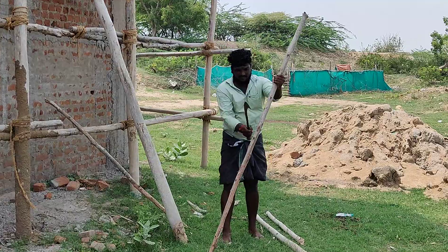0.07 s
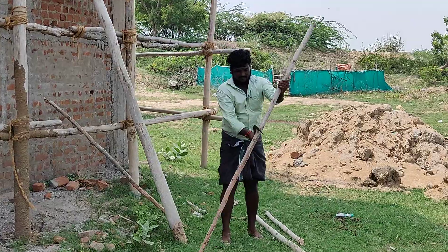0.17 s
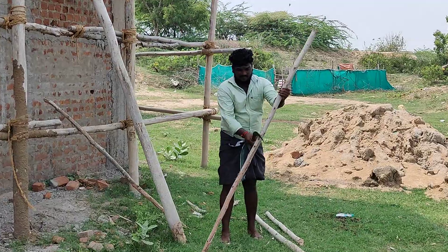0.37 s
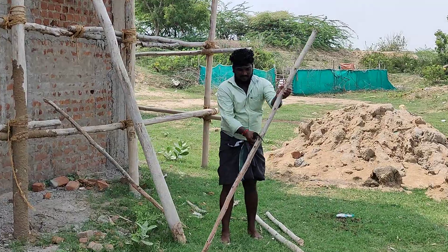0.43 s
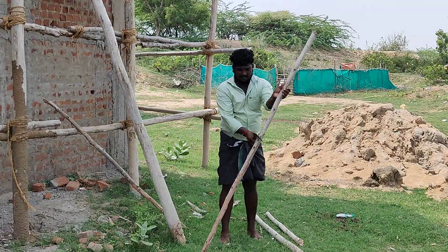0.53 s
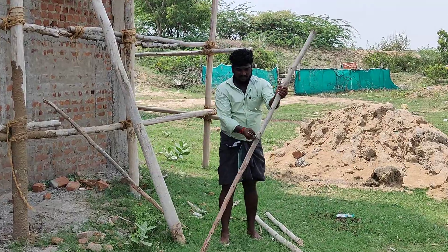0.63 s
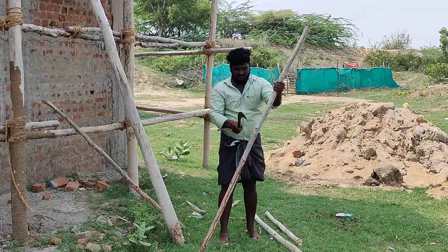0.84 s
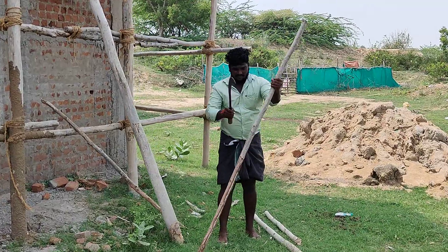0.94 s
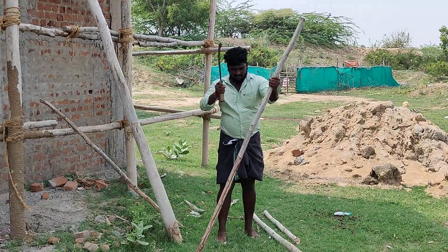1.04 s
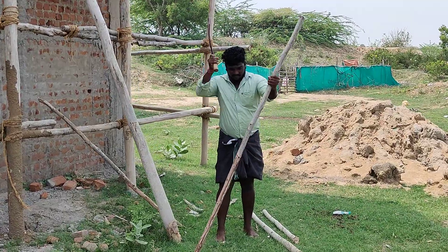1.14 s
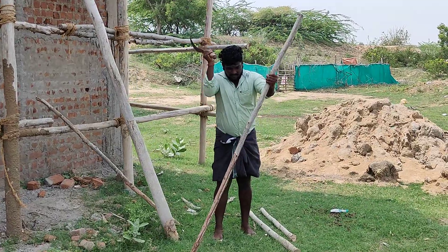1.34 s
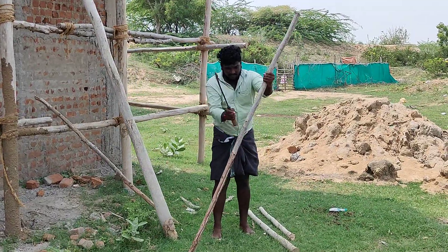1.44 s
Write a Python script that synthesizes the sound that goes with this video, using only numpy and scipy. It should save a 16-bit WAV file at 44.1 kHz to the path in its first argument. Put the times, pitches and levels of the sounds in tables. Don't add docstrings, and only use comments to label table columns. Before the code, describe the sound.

A long blade chops once into a bamboo pole with a sharp splintering crack, outdoors

```python
import sys
import numpy as np
from scipy import signal
from scipy.io import wavfile
from scipy.ndimage import uniform_filter1d

SR = 44100
rng = np.random.default_rng(int(sys.argv[2]) if len(sys.argv) > 2 else 0)


def int16_out(signal):
    q = np.round(np.clip(np.atleast_2d(signal).T, -1, 1) * 32767)
    wavfile.write(sys.argv[1], SR, q.astype(np.int16))


def volts_from_decibels(level):
    exponent = np.asarray(level, float) / 20
    return 10 ** exponent


N = 66150

# time in seconds, level in dB.
TEAR_EFFORT = [(.2, -42), (.2036, -29), (.2043, -22.5), (.232, -15), (.243, -21), (.262, -29.5),
               (.278, -41), (.3, -50.5)]
# frequency in Hz, level in dB per Hz.
SPLINTER_COLOUR = [(350, -24), (700, 3), (1200, -15.5), (2000, 7), (4000, 8), (6500, 7), (8000, -2),
                   (16000, -35.5)]
# start in seconds, level in dB.
FIBRE_FLASHES = [
    (.204, -33.5),
    (.2075, -36),
    (0.215, -23.5),
    (0.221, -14.5),
    (0.2282, -30.5),
    (0.2465, -30),
]
# time in seconds, level in dB.
BLADE_PUSHES = [
    (0.204, -11),
    (.208, -2.5),
    (0.2137, -6),
    (.2165, -5),
    (0.2207, -16),
    (0.231, -30),
]
# frequency in Hz, level in dB, t60 in seconds.
POLE_MODES = [(110, -24.5, 0.071), (221, -35, .11), (293, -29.5, 0.07), (519, -30.5, 0.061),
              (736.5, -25, 0.11), (1077, -18.5, 0.07), (1221, -12.5, 0.065), (824, -22.5, 0.049),
              (1930, -25, 0.16), (1313, -20, 0.13)]
# time in seconds, peak in dB, pitch in Hz, left minus right in dB.
FIBRE_SNAPS = [(.2042, -5, 3230, 13.5), (.2062, -7.5, 2630, 7.5), (.2079, 4, 4600, 8),
               (.2080, -14, 2190, -11.5), (.2140, -11.5, 2600, 23), (.2148, -6, 6000, 5.5),
               (.2158, 3, 1270, -12.5), (.2165, -9.5, 1900, 0), (.2210, -5, 4400, -4),
               (.2222, -3.5, 5770, -4.5), (.2303, -4.5, 6300, -2), (.2325, -1, 2900, -13),
               (.2387, -3, 3600, -4.5), (.2443, -9, 3020, -8), (.2410, -12.5, 3600, -4.5)]
# time in seconds, peak in dB, pitch in Hz, left minus right in dB.
WALL_SLIVERS = [(0.2058, -7.0, 3340.0, 13.0), (0.206, -16.0, 2580.0, -19.0), (0.2062, -16.0, 3940.0, 9.0),
                (0.2064, -14.0, 1940.0, -3.0), (0.2068, -18.0, 4820.0, 0.0), (0.2082, -17.0, 1140.0, 3.0),
                (0.212, -16.0, 3980.0, 13.0), (0.2122, -16.0, 2020.0, -3.0), (0.2135, -16.0, 6630.0, -4.0),
                (0.2144, -13.0, 1420.0, -3.0), (0.2149, -15.0, 5340.0, -15.0),
                (0.2153, -15.0, 3120.0, -3.0), (0.2162, -17.0, 3700.0, -5.0), (0.2198, -16.0, 5320.0, -4.0),
                (0.2198, -15.0, 4370.0, 2.0), (0.22, -17.0, 5770.0, -5.0), (0.2204, -17.0, 6350.0, -3.0),
                (0.2205, -17.0, 3120.0, -18.0), (0.2218, -18.0, 7110.0, -13.0),
                (0.2251, -14.0, 3190.0, -19.0), (0.226, -18.0, 1310.0, -37.0),
                (0.2273, -18.0, 6630.0, -19.0), (0.2294, -16.0, 5360.0, 2.0), (0.23, -16.0, 2450.0, -4.0),
                (0.23, -14.0, 6160.0, -7.0), (0.2303, -17.0, 7260.0, 2.0), (0.2311, -18.0, 4720.0, -12.0),
                (0.2311, -12.0, 3060.0, -7.0), (0.2318, -18.0, 3940.0, 0.0), (0.2383, -15.0, 3700.0, -4.0),
                (0.2395, -17, 3500, -4)]
# time in seconds, peak in dB, pitch in Hz, left minus right in dB.
CHIP_TICKS = [(.0642, -35.5, 3820, -22), (.1733, -47.5, 4100, -28), (.2, -36, 3902, 8),
              (.3232, -25.5, 6300, -17), (.3255, -31.5, 6360, -15), (.3788, -25, 4030, -8),
              (.3808, -29, 3880, -12), (.3853, -29.5, 3860, -8), (.3883, -31, 3600, 15),
              (.3942, -36.5, 3800, -31), (.3962, -25.5, 4270, 0), (.5523, -35, 2064, -6),
              (.5558, -31.5, 2150, -19), (.7518, -32.5, 3600, 12), (.7522, -34.5, 6370, 16),
              (.7617, -26, 6260, 6.5), (.7638, -30.5, 6350, -11)]
# start in seconds, attack in seconds, body in dB,
# t60 in seconds, fizz in dB.
SCRAPE_STROKES = [(-.02, 0.011, -84.5, 0.25, -49.5), (0.052, 0.013, -35, 0.11, -44.5),
                  (0.098, 0.0028, -43.5, 0.12, -49), (0.165, 0.0012, -62, 0.076, -50),
                  (.25, 0.014, -53, 0.61, -43.5), (.3, 0.016, -42, 0.48, -56),
                  (0.365, 0.018, -43, 0.21, -63), (0.544, 0.0025, -33.5, 0.41, -45.5),
                  (0.581, 0.021, -40.5, 0.093, -59.5), (0.711, 0.029, -52, 0.12, -57.5),
                  (0.749, 0.0012, -40.5, 0.077, -40.5), (0.759, 0.00055, -41.5, 0.071, -41.5)]
# frequency in Hz, width in Hz, level in dB.
SCRAPE_MODES = [(2083, 440, -3.5), (2840, 510, 0), (4100, 370, 3), (6530, 510, 0.5), (1700, 350, -6)]
# time in seconds, frequency in Hz, level in dB, t60 in seconds.
METAL_CHINKS = [(.064, 2154, -40.5, 0.044), (.1, 5300, -39, 0.085), (.105, 7120, -47, 0.024),
                (.548, 2600, -31.5, 0.16), (.568, 2130, -36, 0.091), (0.79, 5500, -38, 0.056),
                (.575, 520, -52, 0.12), (.308, 3000, -38.5, 0.063), (1.075, 2300, -49.5, 0.046),
                (1.087, 2200, -48.5, 0.045), (1.338, 2250, -49, 0.096), (1.36, 2180, -52, 0.057),
                (1.38, 2170, -53, 0.063), (.7612, 2100, -34, 0.015)]
# time in seconds, peak in dB, pitch in Hz, left minus right in dB.
METAL_RATTLE = [(0.548, -36, 4150, -10), (0.5512, -33.0, 2500.0, -11.0), (0.5525, -31.0, 4110.0, -12.0),
                (0.5527, -39.0, 3490.0, -7.0), (0.5563, -38.0, 6030.0, -15.0),
                (0.5569, -36.0, 2950.0, -12.0), (0.561, -30.0, 4090.0, -12.0),
                (0.5623, -36.0, 2890.0, -13.0), (0.563, -34.0, 2500.0, -10.0),
                (0.5663, -34.0, 2200.0, -11.0), (0.5668, -38.0, 1640.0, -2.0),
                (0.5732, -39.0, 3510.0, -14.0), (0.5745, -34.0, 2130.0, -10.0),
                (0.5815, -39.0, 4030.0, -19.0), (0.6106, -39.0, 2930.0, -14.0)]
# time in seconds, level in dB.
HISS_LEVEL = [(0, -50.5), (.15, -53), (.26, -46), (.45, -52.5), (.66, -54.5), (.98, -54.5), (1.05, -55.5),
              (1.1, -53.5), (1.24, -55), (1.3, -55.5), (1.5, -58)]
# frequency in Hz, level in dB.
HISS_SPECTRUM = [(900, -24.5), (1700, -5.5), (2200, -3), (3000, 1.5), (3900, 3.5), (5200, -2.5),
                 (6800, -4.5), (16000, -37)]
# frequency in Hz, level in dB.
RUMBLE_SPECTRUM = [(28, -10.5), (90, 2.5), (240, -3.5), (700, -15.5), (1500, -16), (4000, -45), (8000, -34),
                   (16000, -45.5)]
# time in seconds, level in dB.
WIND_GUST = [(0, -57.5), (.07, -55.5), (.11, -43), (.15, -65), (.25, -58), (.3, -53), (.43, -62),
             (.46, -45), (.495, -59.5), (.75, -60.5), (1.0, -71), (1.1, -64), (1.42, -60.5), (1.5, -43)]

PORT_LAG_S = 0.00044


def rms_one(x):
    return x / np.sqrt(np.mean(x ** 2) + 1e-20)


def in_time(rows):
    return np.interp(np.arange(N) / SR, *np.transpose(rows))


def at_hz(points, hz):
    points_hz, points_db = np.transpose(points)
    return np.interp(np.log(hz), np.log(points_hz), points_db)


def above(x, hz):
    return signal.sosfilt(signal.butter(2, hz, "high", fs=SR, output="sos"), x)


def swell(start_s, rise_s, t60_s):
    t = np.arange(N) / SR - start_s
    return np.clip(t / rise_s, 0, 1) * volts_from_decibels(-60 * np.clip(t - rise_s, 0, 9) / t60_s)


def drift(rate_hz):
    r = np.exp(-80 * np.pi * rate_hz / SR)
    slow = signal.lfilter([1], [1, -2 * r, r * r], rng.standard_normal(N // 40 + 2002))[2000:]
    return np.interp(np.arange(N) / 40, np.arange(len(slow)), rms_one(slow))


def ring(strikes, hz, t60_s):
    r, w = volts_from_decibels(-60 / (t60_s * SR)), 2 * np.pi * hz / SR
    return signal.lfilter([0, np.sin(w)], [1, -2 * r * np.cos(w), r * r], strikes + 1e-18)


def grains(rate_per_s, spread_db):
    sizes = volts_from_decibels(spread_db * np.minimum(rng.exponential(1, (3, N)), 4))
    sizes = sizes * rng.choice([-1, 1], (3, N))
    return sizes * (rng.random((3, N)) < rate_per_s / SR)


def bands(spectrum, patchy_db):
    out = 0
    edges_hz = 28 * 2 ** np.arange(0, 9.4, 1 / 3)
    white = rng.standard_normal((2, 3, N + 4000))
    for k, (low, high) in enumerate(zip(edges_hz, edges_hz[1:])):
        if high > spectrum[0][0]:
            gain = volts_from_decibels(at_hz(spectrum, np.sqrt(low * high)) + patchy_db * drift(25))
            sos = signal.butter(2, [low, high], "band", fs=SR, output="sos")
            out = out + gain * signal.sosfilt(sos, white[k % 2])[:, 4000:]
    return rms_one(out)


def pair(x, hz, alike):
    low = signal.lfilter(*signal.butter(1, hz, fs=SR), x)
    return np.sqrt(alike) * low[0] + np.sqrt(1 - alike) * low[1:] + (x - low)[1:]


def from_right(x):
    shadow_hz, shadow_db, scatter_db = 1110, -34, -19
    late = np.interp(np.arange(N) - PORT_LAG_S * SR, np.arange(N), x[0])
    low = signal.lfilter(*signal.butter(1, shadow_hz, fs=SR), x[0])
    left = low + volts_from_decibels(shadow_db) * (x[0] - low) + volts_from_decibels(scatter_db) * x[1]
    return np.array([left, late])


def tear():
    splinters_per_s, spread_db, ring_cycles, dulling_db_per_s = 13000, 3, 15.1, 119
    train, dealt = grains(splinters_per_s, spread_db), rng.integers(0, 24, (3, N))
    t = np.arange(N) / SR
    since_s, out = np.clip(t - 0.235, 0, 1), 0
    for k, hz in enumerate(np.geomspace(350, 15000, 24)):
        dull = volts_from_decibels(-dulling_db_per_s * since_s * np.log2(hz / 2000))
        tone = ring(train * (dealt == k), hz, ring_cycles / hz)
        out = out + volts_from_decibels(at_hz(SPLINTER_COLOUR, hz)) * hz * dull * tone
    start_s, end_s = TEAR_EFFORT[0][0], TEAR_EFFORT[-1][0]
    out = out / np.std(out[:, :int(start_s * SR)])
    inside = (t > start_s) * volts_from_decibels(-300 * np.clip(t - end_s, 0, 1))
    return above(volts_from_decibels(in_time(TEAR_EFFORT)) * inside * pair(out, 915, 0.59), 930)


def flashes():
    force = sum(volts_from_decibels(db) * swell(s, 0.00038, t60_s=0.032) for s, db in FIBRE_FLASHES)
    return force * rms_one(above(grains(12000, 1.0)[1:], 6600))


def pole():
    push_s, push_db = np.transpose(BLADE_PUSHES)
    out = 0
    for hz, level_db, t60_s in POLE_MODES:
        hits = np.zeros(N)
        hits[(push_s * SR).astype(int)] = volts_from_decibels(push_db + level_db + rng.normal(0, 5.5, len(push_s)))
        soft_hits = signal.lfilter([0.1], [1, -0.9], hits)
        out = out + ring(soft_hits, hz, t60_s)
    out = above(above(out, 70), 60)
    return np.array([np.roll(out, -8) * volts_from_decibels(-0.3), out])


def clicks(rows, cycles, trim_db, edge_db):
    out, draws = np.zeros((2, N + SR)), rng.standard_normal((len(rows), 2, 400))
    t = np.arange(400) / SR
    for (s, db, hz, pan_db), draw in zip(rows, draws):
        age = t * hz / cycles
        envelope = np.e * age * np.exp(-age)
        for side, sign in enumerate((1, -1)):
            port_hz = hz * (1 + 0.014 * draw[side, 1])
            tone = envelope * np.sin(2 * np.pi * port_hz * t + draw[0, 0])
            tone = tone + volts_from_decibels(edge_db) * above(draw[side] * np.exp(-t / 0.0008), 1300)
            i = int((s + side * PORT_LAG_S) * SR)
            out[side, i:i + len(t)] += volts_from_decibels(db + trim_db + sign * pan_db / 2) * tone
    return out[:, :N]


def rings(rows, rise_s, trim_db):
    out, phases = np.zeros((2, N + SR)), rng.uniform(0, 2 * np.pi, len(rows))
    t = np.arange(900) / SR
    envelope = np.e * t / rise_s * np.exp(-t / rise_s)
    for (s, db, hz, pan_db), phase in zip(rows, phases):
        tone = envelope * np.sin(2 * np.pi * hz * t + phase)
        shares = volts_from_decibels([pan_db / 2, -pan_db / 2])
        shares = shares / np.hypot(*shares)
        for side, share in enumerate(shares):
            i = int((s + side * PORT_LAG_S) * SR)
            out[side, i:i + len(t)] += volts_from_decibels(db + trim_db) * share * tone
    return out[:, :N]


def scrape():
    grit = grains(rate_per_s=7300, spread_db=2)
    body = 0
    for k, (hz, width_hz, db) in enumerate(SCRAPE_MODES):
        body = body + (-1) ** k * volts_from_decibels(db) * rms_one(ring(grit, hz, 1.54 / width_hz))
    body = rms_one(above(body, 900))
    body = signal.sosfilt(signal.butter(4, 7600, fs=SR, output="sos"), body)
    fizz = rms_one(above(signal.lfilter([1], [1, -0.6], grains(20000, 1.6)), 7350))
    out = 0
    for s, rise_s, db, t60_s, fizz_db in SCRAPE_STROKES:
        out = out + volts_from_decibels(db) * swell(s, rise_s, t60_s) * body
        out = out + volts_from_decibels(fizz_db) * swell(s, rise_s, 0.77 * t60_s) * fizz
    return out


def chinks():
    out, draws = np.zeros((3, N)), rng.standard_normal((len(METAL_CHINKS), 3, 120))
    for (s, hz, db, t60_s), draw in zip(METAL_CHINKS, draws):
        burst, i = np.zeros((3, N)), int(s * SR)
        burst[:, i:i + 120] = draw * np.hanning(120)
        tone = ring(ring(burst, hz, t60_s), hz, 0.0048)
        out += volts_from_decibels(db) * tone / abs(tone).max(axis=1, keepdims=True)
    return out


def hiss():
    tinkles_per_s, tinkle_cycles, tinkle_db = 1800, 160, -8
    shelf_hz, shelf_db = 7010, -6
    train, dealt = grains(tinkles_per_s, 1.5), rng.integers(0, 30, (3, N))
    tinkle = 0
    for k, hz in enumerate(np.geomspace(2050, 6800, 30)):
        tone = ring(train * (dealt == k), hz, tinkle_cycles / hz)
        tinkle = tinkle + volts_from_decibels(at_hz(HISS_SPECTRUM, hz)) * hz * tone
    both = bands(HISS_SPECTRUM, patchy_db=1.3) + volts_from_decibels(tinkle_db) * rms_one(tinkle)
    both = signal.sosfilt(signal.cheby2(6, -shelf_db, shelf_hz, fs=SR, output="sos"), both)
    return volts_from_decibels(in_time(HISS_LEVEL) + 3) * both


def wind():
    sos = signal.butter(3, [12, 55], "band", fs=SR, output="sos")
    low = signal.sosfilt(sos, rng.standard_normal((2, N + SR)))[:, SR:]
    low = low / np.sqrt(uniform_filter1d(low ** 2, size=2500) + 1e-12)
    lumps = volts_from_decibels(in_time(WIND_GUST) + 2.0 * np.array([drift(14.6), drift(15)]))
    lumps = uniform_filter1d(lumps, size=600)
    left_db, right_db = 4.0, -9
    return low * lumps * volts_from_decibels([[left_db], [right_db]])


def rumble():
    return volts_from_decibels(-59) * pair(bands(RUMBLE_SPECTRUM, patchy_db=-0.5), 800, alike=0.79)


def echo():
    sos = signal.butter(2, (426, 899), "band", fs=SR, output="sos")
    noise = rms_one(signal.sosfilt(sos, rng.standard_normal((3, N))))
    return volts_from_decibels(-60) * swell(-0.02, 0.01, t60_s=3.7) * pair(noise, 1500, alike=0.7)


def scene():
    snaps = clicks(FIBRE_SNAPS, cycles=0.53, trim_db=-9.5, edge_db=-4.5)
    slivers = rings(WALL_SLIVERS, rise_s=0.0013, trim_db=3)
    chop = tear() + flashes() + pole() + snaps + slivers
    ticks = clicks(CHIP_TICKS, cycles=2.4, trim_db=-5, edge_db=-27)
    rattle = rings(METAL_RATTLE, rise_s=0.0016, trim_db=1)
    right = from_right(scrape() + chinks() + hiss())
    return chop + ticks + right + rattle + wind() + rumble() + echo()


def top_cut(x):
    return signal.sosfilt(signal.butter(12, 16800, fs=SR, output="sos"), x)


def record(dry):
    rounded = 0.9 * np.tanh(dry / 0.9)
    mix = signal.sosfilt(signal.cheby2(14, 32, 15900, fs=SR, output="sos"), rounded)
    return top_cut(mix)


dry = scene()
out = record(dry)
int16_out(out)
```